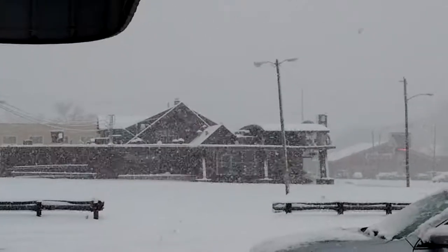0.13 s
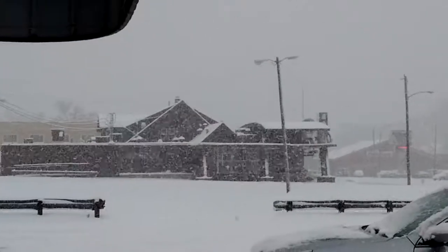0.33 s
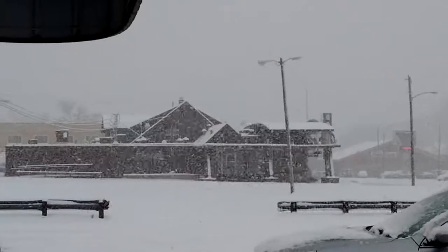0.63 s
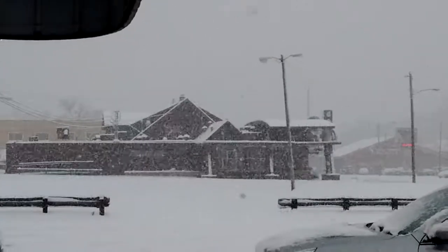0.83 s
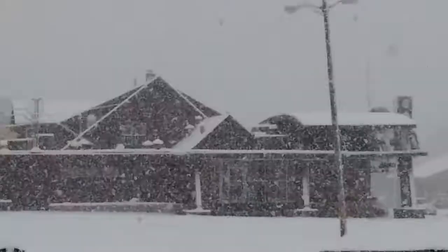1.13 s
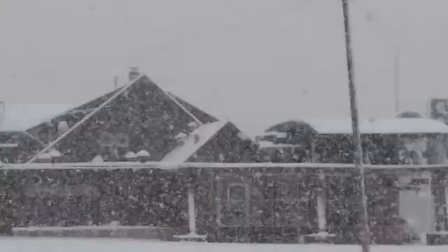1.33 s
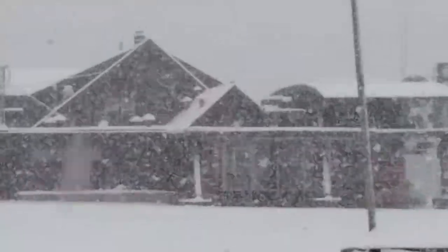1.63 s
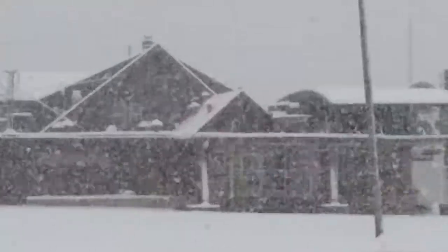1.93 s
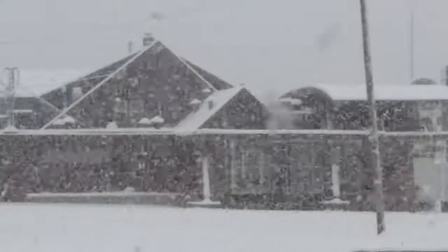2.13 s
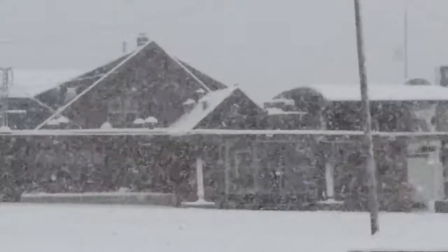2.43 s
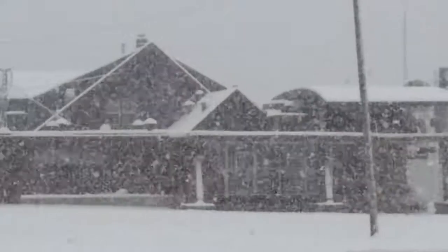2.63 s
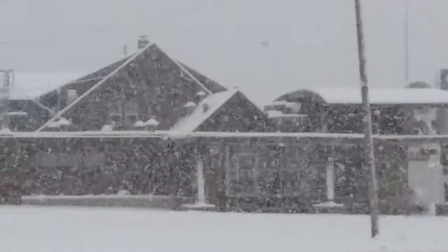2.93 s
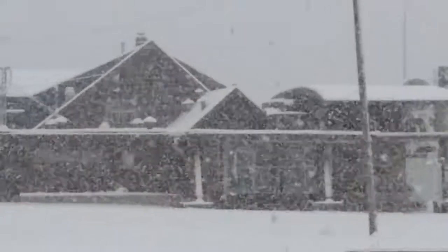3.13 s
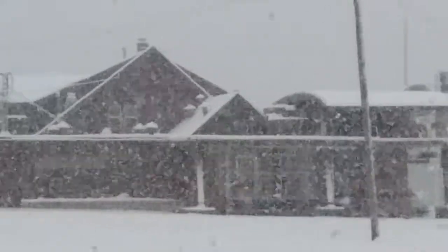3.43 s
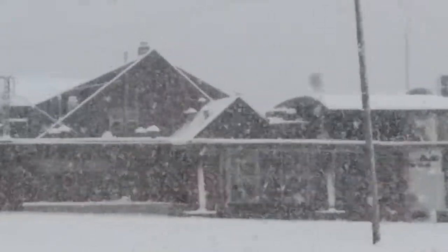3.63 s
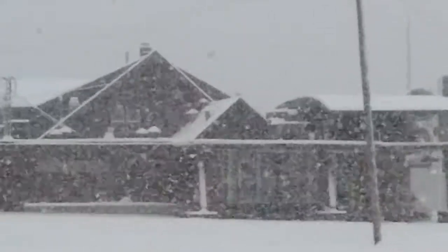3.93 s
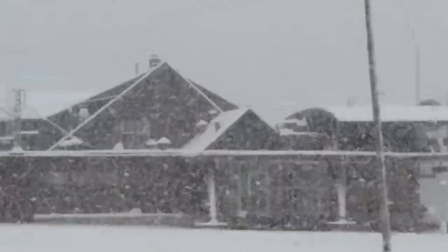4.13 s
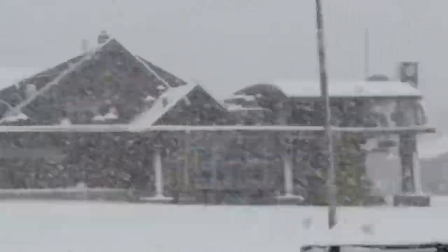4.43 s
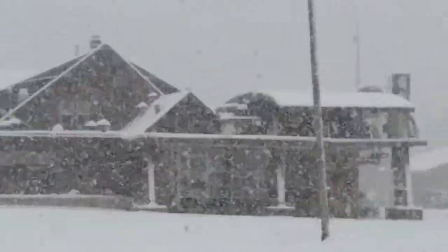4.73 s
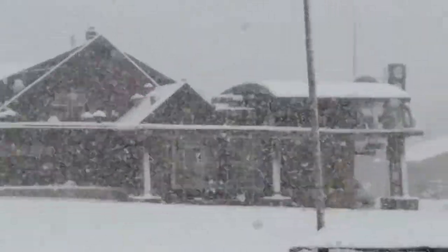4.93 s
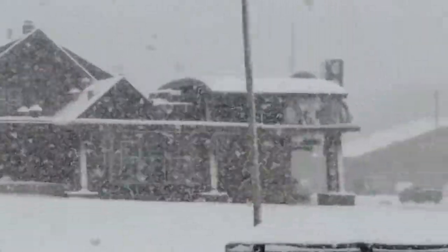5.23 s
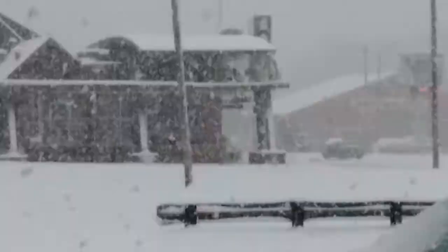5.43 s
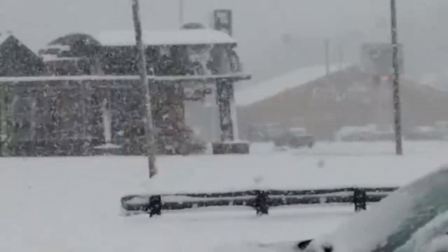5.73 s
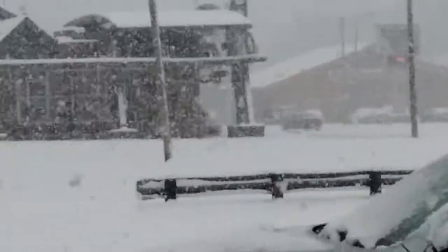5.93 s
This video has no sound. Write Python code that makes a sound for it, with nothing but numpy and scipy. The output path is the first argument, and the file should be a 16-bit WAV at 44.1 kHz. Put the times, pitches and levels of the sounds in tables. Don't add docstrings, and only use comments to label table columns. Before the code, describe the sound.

Wind rumbles and snowy hiss slowly fades as a machine chuffs away with faint squeaks; finger ticks and a hard knock hit the phone case.

```python
import sys
import numpy as np
from scipy import signal
from scipy.fft import rfft, irfft, next_fast_len
from scipy.io import wavfile
from scipy.ndimage import uniform_filter1d

SR = 44100
rng = np.random.default_rng(int(sys.argv[2]) if len(sys.argv) > 2 else 0)


def natural_amplitude(level_db):
    exponent = np.asarray(level_db, float) / 20
    return 10 ** exponent


def unload_audio(sound):
    columns = np.transpose(np.atleast_2d(sound))
    steps = np.round(np.clip(columns, -1, 1) * 32767)
    wavfile.write(sys.argv[1], SR, steps.astype(np.int16))


N = 268965


def evened(x):
    return x / np.sqrt(np.mean(x ** 2) + 1e-20)


def swell(t, ms):
    return np.exp(-(2000 * t / ms) ** 2)


def read(points, hz, column=1):
    table = np.transpose(points)
    return np.interp(np.log(hz + 1), np.log(table[0] + 1), table[column])


def resonate(x, hz, width):
    carrier = np.exp(2j * np.pi * np.cumsum(hz * np.ones(len(x))) / SR)
    r = np.exp(-np.pi * width / SR)
    return 2 * (carrier * signal.lfilter([1 - r], [1, -r], x / carrier)).real


def capsules(x, lag_ms, balance_db):
    size = next_fast_len(len(x))
    delay = np.exp(-2j * np.pi * np.fft.rfftfreq(size, 1 / SR) * lag_ms / 1000)
    late = irfft(rfft(x, size) * delay, size)[:len(x)]
    return np.array([-late * natural_amplitude(balance_db / 2), x * natural_amplitude(-balance_db / 2)])


def add(mix, s, sound):
    part = mix[:, round(s * SR):][:, :sound.shape[1]]
    part += sound[:, :part.shape[1]]


def hits(rows, lag_ms=0.32):
    t, out = np.arange(5120) / SR, np.zeros((2, N))
    for s, db, hz, t60_ms, balance_db in rows:
        onset = (1 - np.exp(-t * hz * 3.8)) ** 2
        ring = np.sin(2 * np.pi * hz * t) * natural_amplitude(-60000 * t / t60_ms) * onset
        add(out, s, capsules(natural_amplitude(db) * ring / abs(ring).max(), lag_ms, balance_db))
    return out


def slips(rows, rise_hz_per_s=0):
    out, t = np.zeros((2, N)), np.arange(-3072, 3072) / SR
    for s, db, hz, ms, width, balance_db in rows:
        glide = hz + rise_hz_per_s * t
        ring = resonate(resonate(rng.standard_normal(len(t)), glide, width), glide, width)
        add(out, s + t[0], capsules(natural_amplitude(db) * evened(ring) * swell(t, ms), 0.313, balance_db))
    return out


# frequency in Hz, shared part from 0 to 1, lead of the difference in radians.
CAPSULE_LIKENESS = [(40, 0.4, -0.5), (130, 0.71, 0.3), (340, 0.34, 1.6), (700, 0.78, 2), (1220, 0.65, 2.5),
                    (1800, 0, 1.7), (2400, 0.9, 2), (3040, 1, -18.5), (3380, 0.56, 2), (4300, 0.77, 0),
                    (5000, 1, 1.3), (6860, 0.3, -2.5), (9000, 1, 16), (16000, 0.3, 25)]


def wash(total, diff, diff_db, patchy_db, flicker_db, ripple_db, size, drift=None):
    hop = size // 4
    frames, hz = N // hop + 5, np.fft.rfftfreq(size, 1 / SR)
    a, b, c, d, patches = rng.standard_normal((frames, len(hz), 5)).T
    patches = uniform_filter1d(patches, size=size // 64, axis=0)
    patches = evened(uniform_filter1d(patches, size=3000 // hop + 2, axis=1))
    flicker = evened(uniform_filter1d(rng.standard_normal(frames), size=4))
    ripple = rng.standard_normal(len(hz))[:, None]
    field_db = patchy_db * patches + flicker_db * flicker + ripple_db * ripple
    if drift is not None:
        field_db = field_db + drift(hz, np.minimum(np.arange(frames) * hop, N - 1))

    share = np.clip(read(CAPSULE_LIKENESS, hz), 0, 1)[:, None]
    lead = np.exp(1j * read(CAPSULE_LIKENESS, hz, column=2))[:, None]
    first = a + 1j * b
    second = share * lead * first + np.sqrt(1 - share ** 2) * (c + 1j * d)
    first = first * natural_amplitude(read(total, hz))[:, None]
    second = second * natural_amplitude(read(diff, hz) + diff_db)[:, None]
    z = np.array([first, second]) * natural_amplitude(field_db)
    mid, side = signal.istft(z, nperseg=size, noverlap=size - hop)[1][:, :N]
    return np.array([mid + side, mid - side]) / mid.std()


# time in seconds, hiss level in dB, wind pressure on the car in dB.
STORM_COURSE = [(0, -35.5, -24), (.6, -36.5, -26.5), (1, -36.5, -24.5), (1.5, -37, -25.5),
                (2.1, -36.5, -24.5), (3.3, -37.5, -25.5), (4, -39, -26.5), (5.2, -42, -24.5),
                (5.5, -41, -22.5), (6.1, -42.5, -26)]


def storm(column):
    table = np.transpose(STORM_COURSE)
    return np.interp(np.arange(N) / SR, table[0], table[column])


# frequency in Hz, density in dB per Hz.
RUMBLE_TOGETHER = [(12, -32), (25, -4), (39, 1.5), (50, -5.5), (75, 1.5), (100, -7.5), (125, -9),
                   (183, -13.5), (278, -17), (416, -15.5), (600, -31), (1000, -110)]
RUMBLE_APART = [(12, -30), (21, -12), (30, -5), (39, -1.5), (60, -1.5), (86, -1), (101, -6), (120, -9.5),
                (142, -7.5), (188, -12.5), (220, -11.5), (300, -16.5), (400, -23.5), (1000, -110)]


def rumble():
    return natural_amplitude(storm(column=2) - 22) * wash(RUMBLE_TOGETHER, RUMBLE_APART, 22.4, 2.6, 0.4, 0, size=4096)


# frequency in Hz, density in dB per Hz.
HISS_TOGETHER = [(240, -26), (400, -22.5), (500, -17), (620, -8.5), (780, -6.5), (1320, 0), (1590, -1.5),
                 (2020, -8.5), (2600, -13.5), (2960, -25.5), (3600, -19.5), (4350, -15), (5050, -23.5),
                 (5350, -27), (6300, -35.5), (7800, -27.5), (9500, -37.5), (11500, -77)]
HISS_APART = [(240, -36), (400, -3), (500, -1), (600, -2), (720, 1), (1250, -8.5), (1610, -21),
              (2040, -14.5), (2490, -7.5), (2840, -13), (3330, -11), (3960, -23), (6800, -28), (8200, -36),
              (9300, -36), (11500, -80)]
# time in seconds, depth in dB, length in ms.
HAND_SHADES = [
    (.9, 3, 280),
    (4.35, 3.5, 830),
]
# frequency in Hz, share of the turn's dB.
SWING_COLOUR = [(600, 0), (1150, -1), (1450, 0), (1800, 1), (2800, 0)]
FIZZ_DB, FIZZ_FADE = 1, 0.18
SWING_DB, SWING_FROM_S, SWING_TAKES_S = 1.5, 4.35, 0.69


def hiss():
    level_db, t = storm(column=1), np.arange(N) / SR
    shade_db = sum(db * swell(t - s, ms) for s, db, ms in HAND_SHADES)
    fizz_db = FIZZ_DB + FIZZ_FADE * (level_db - level_db[0]) - shade_db
    swing_db = SWING_DB * np.clip((t - SWING_FROM_S) / SWING_TAKES_S, 0, 1)

    def drift(hz, at):
        return (hz > 3000)[:, None] * fizz_db[at] + read(SWING_COLOUR, hz)[:, None] * swing_db[at]

    return natural_amplitude(level_db) * wash(HISS_TOGETHER, HISS_APART, 0, 1.0, 0.99, 2.33, size=1024, drift=drift)


# frequency in Hz, level in dB, start in seconds, end in seconds, width in Hz.
MOTOR_TONES = [
    (166, -35, 0, .75, 10),
    (207, -41, .85, 2.3, 10),
    (910, -51, 0, .7, 6),
    (1367, -41, 0, .72, 14),
    (1641, -43, 0, .8, 8),
    (1125, -50, 0, 2.2, 14),
    (2463, -56, 0, 3.5, 8),
    (70, -35, 2.2, 6.1, 5),
    (2921, -59, 0, .7, 6),
    (4380, -54, 0, .85, 350),
]


def whines():
    out = np.zeros((2, N))
    for hz, db, start, end, width in MOTOR_TONES:
        t = np.arange(round((end - start) * SR)) / SR
        gate = np.clip(np.minimum(t + 0.084, end - start - t) / 0.17, 0, 1)
        fuzz = evened(resonate(rng.standard_normal(len(t)), hz, width))
        tone = fuzz + 120 / (width + 90) * np.sin(2 * np.pi * hz * t)
        lag_ms, balance_db = (.33, -1.5) if hz > 400 else (.09, 1.1)
        add(out, start, capsules(natural_amplitude(db) * gate * evened(tone), lag_ms, balance_db))
    return out


# frequency in Hz, density in dB per Hz.
SELF_TOGETHER = [(8400, -35), (9500, -1.5), (13200, -0.5), (13500, -11), (13700, -46), (14450, -46),
                 (14600, -5), (15480, 3), (15600, -50)]
SELF_APART = [(8400, -30), (9400, 11.5), (11700, -29), (12300, 6), (13000, -2), (15000, 2), (15250, -7),
              (15400, -50)]
# frequency in Hz, rms level in dB.
PICKUP_LINES = [(10000, -90), (12800, -83), (13000, -75), (13200, -87), (15000, -86), (15200, -89)]
BUZZ_DB, BUZZ_RING_HZ = -74, 9000
BUZZ_HZ, FRAME_HZ = 200, 25


def electronics():
    t = np.arange(N) / SR
    lines = sum(natural_amplitude(db) * np.sqrt(2) * np.sin(2 * np.pi * hz * t) for hz, db in PICKUP_LINES)
    sparks = np.diff(np.floor(t * BUZZ_HZ), prepend=0) * (t * FRAME_HZ % 1 < .5)
    buzz = natural_amplitude(BUZZ_DB) * evened(resonate(resonate(sparks, BUZZ_RING_HZ, 900), BUZZ_RING_HZ, 900))
    noise = natural_amplitude(-67.0) * wash(SELF_TOGETHER, SELF_APART, -0.89, 1.4, 0.82, 0.74, size=512)
    return noise + (lines + buzz) * np.array([[1.5], [.6]])


# time in seconds, level in dB, length in ms, left minus right in dB.
PALM_THUDS = [
    (0.099, -32, 49, 1),
    (.82, -42, 140, -3.5),
    (3.6, -37.5, 60, 6.5),
    (4.1, -37.5, 53, 7),
    (4.201, -34.5, 70, 6),
    (4.3, -43, 46, 12.5),
]


def thuds():
    return slips([(s, db, 148.5, ms, 83, side) for s, db, ms, side in PALM_THUDS])


CHUFF_LEVELS = [
    1.5,
    -1.5,
    -5.5,
    -1.5,
    2,
    3,
    3.5,
    1.5,
    6.5,
    -13,
]
# frequency in Hz, density in dB per Hz.
CHUFF_TOGETHER = [(300, -55), (600, -16.5), (680, -3), (770, -4.5), (1000, -14), (1500, 5.5), (1950, -23.5),
                  (2270, -2), (3020, -33.5), (3500, -15), (4600, -13.5), (5490, -24), (6600, -41),
                  (7940, -21), (9160, -44), (13000, -54), (13600, -94)]
CHUFF_APART = [(240, -37), (400, 0), (587, -10), (770, -2), (967, -9), (1660, -20), (2300, -8), (2850, -22),
               (3480, -17), (3950, -23), (4500, -26), (9420, -40), (12000, -52), (15600, -80),
               (22000, -120)]
TURN_S, FIRST_TURN_S = .351, .542
CHUFF_MS, CHUFF_SHARPEN, CHUFF_LONGEST_MS = 38, .7, 90


def chuffs():
    t, puffs = np.arange(N) / SR, np.zeros(N)
    for k, db in enumerate(CHUFF_LEVELS):
        ms = min(CHUFF_MS * natural_amplitude(-CHUFF_SHARPEN * db), CHUFF_LONGEST_MS)
        puffs += natural_amplitude(db) * swell(t - FIRST_TURN_S - k * TURN_S, ms)
    noise = wash(CHUFF_TOGETHER, CHUFF_APART, 3.2, 0.86, 2.7, 0.89, size=512)
    return natural_amplitude(storm(column=1)) * 1.41 * puffs * noise


# time in seconds, peak in dB, ring in Hz, 60 dB decay in ms, left minus right in dB.
FINGER_TICKS = [(0.7893, -6, 885, 1.3, -3), (0.7892, -18, 170, 16, 1), (3.5837, -14, 160, 29, -1),
                (1.473, -22.5, 2400, 10, -2), (3.5834, -9, 824, 1.2, -0.5), (4.193, -26, 3020, 1.5, 1),
                (4.2042, -19.5, 2250, 10, -3), (4.291, -19, 885, 1.6, -7), (4.341, -30.5, 4420, 3.7, 1),
                (4.3582, -24, 1510, 1.5, -11), (4.37, -18, 340, 5.2, 6.5), (4.5688, -19, 1800, 1.6, -4),
                (4.586, -24.5, 2300, 25, -3), (4.744, -26, 1800, 4, 1), (5.6372, -22, 1540, 3.1, 0),
                (5.644, -15.5, 1690, 1.4, -1)]


def ticks():
    return hits(FINGER_TICKS)


# time in seconds, level in dB, centre in Hz, length in ms, left minus right in dB.
FINGER_RUBS = [(0.904, -50.5, 6900, 110, -6), (4.195, -54, 6000, 18, 7), (4.265, -53, 5570, 14, 10),
               (4.342, -53, 7800, 27, 0), (4.34, -62, 13500, 30, 0), (4.44, -56, 8000, 26, -4),
               (4.49, -59, 12000, 17, 0), (4.47, -26, 410, 45, -4), (4.481, -32, 1470, 18, -3),
               (4.485, -49.5, 7550, 34, -5), (4.506, -28.5, 700, 28, 5), (5.645, -33.5, 584, 12, 6)]


def rubs():
    return slips([(s, db, hz, ms, min(hz, 2500), side) for s, db, hz, ms, side in FINGER_RUBS])


# time in seconds, level in dB, pitch in Hz.
JOINT_SQUEAKS = [
    (1.22, -48, 4730),
    (1.91, -46, 4820),
    (2.255, -40.5, 5000),
    (2.559, -50, 5000),
    (2.6, -37, 4980),
    (2.88, -45, 4920),
    (2.924, -38, 4830),
    (3.27, -47, 4940),
    (3.61, -49.5, 4840),
]
SQUEAK_MS, SQUEAK_WIDTH_HZ, SQUEAK_RISE_HZ_PER_S, SQUEAK_BALANCE_DB = 28, 280, 5000, 6


def squeaks():
    rows = [row + (SQUEAK_MS, SQUEAK_WIDTH_HZ, SQUEAK_BALANCE_DB) for row in JOINT_SQUEAKS]
    return slips(rows, SQUEAK_RISE_HZ_PER_S)


# time in seconds, peak in dB, ring in Hz.
GLASS_CRACKS = [(4.3028, -36, 9000), (4.303, -35, 11400), (4.335, -35, 8200), (4.341, -35, 8400),
                (4.341, -42, 13000), (4.358, -34, 7600), (4.497, -24, 7150), (4.505, -33, 7600),
                (5.6442, -27.5, 7600), (5.6443, -38, 13000), (5.637, -38, 4300)]


def cracks():
    return hits([row + (2, -6) for row in GLASS_CRACKS])


# time in seconds, peak in dB, ring in Hz, 60 dB decay in ms.
DASHBOARD_BOOMS = [
    (4.3705, -13, 125, 45),
    (4.383, -14, 70, 40),
    (4.4545, -13, 145, 60),
    (4.4695, -15, 140, 40),
    (4.4758, -16, 105, 70),
    (4.4975, -10, 140, 115),
    (4.455, -29, 290, 70),
    (4.499, -23, 270, 90),
]


def booms():
    rows = [row + (1.2,) for row in DASHBOARD_BOOMS]
    low = [row for row in rows if row[2] < 200]
    overtones = [row for row in rows if row[2] >= 200]
    return hits(low, lag_ms=.38) + hits(overtones, lag_ms=.9)


# time in seconds, peak in dB, ring in Hz, 60 dB decay in ms, left minus right in dB.
CASE_KNOCK = [
    (4.468, -9, 960, 2.2, 1),
    (4.469, -17, 1960, 4.3, -4),
    (4.483, -18, 2150, 8.4, 3),
    (4.4962, -14.5, 2020, 16, -4),
    (4.4979, -9.5, 870, 5, -9.5),
    (4.5046, -9.5, 1270, 1.3, -2),
    (4.512, -10.5, 1800, 7.8, 4),
    (4.5131, -10, 1800, 3.4, -5),
    (4.514, -17.5, 890, 16, -4),
]


def knock():
    return hits(CASE_KNOCK)


def cabin(x):
    t = np.arange(2048) / SR
    tail = rng.standard_normal((2, len(t))) * natural_amplitude(-60 * t / 0.052) * (t > .0012)
    tail = signal.lfilter([1, -1], [1, -.93], tail)
    return x + natural_amplitude(-14.5) * signal.oaconvolve(x, tail / np.linalg.norm(tail[0]), axes=1)[:, :N]


def scene():
    outside = rumble() + hiss() + whines() + chuffs() + squeaks()
    return outside + cabin(ticks() + cracks() + knock()) + thuds() + rubs() + booms()


# time in seconds, depth in dB.
GAIN_DUCKS = [
    (.795, 3),
    (3.59, 2),
    (4.52, 8),
    (5.65, 1.5),
]
RECOVER_DB_PER_S, RECOVER_FREE_DB = 10.5, .8


def gain_control():
    t, duck_db = np.arange(N) / SR, np.zeros(N)
    for s, depth_db in GAIN_DUCKS:
        progress = np.maximum(t - s, 0) * RECOVER_DB_PER_S / (depth_db - RECOVER_FREE_DB)
        duck_db += depth_db * (t > s) * np.exp(-progress ** 3.0)
    return uniform_filter1d(duck_db, size=900)


# lower edge in Hz, upper edge in Hz, share of the time lost at the start, share at the end.
WEAK_BANDS = [(170, 215, .4, .35), (215, 260, .4, .4), (260, 345, .3, .3), (2850, 3100, .03, .1),
              (6100, 6500, -.05, .6), (6500, 6900, -.1, .55), (9500, 9900, .12, .05),
              (10200, 10500, .15, .05), (10900, 11200, .15, .05), (11500, 11800, .15, .05),
              (13500, 14500, .9, .9)]


def drop_out(x):
    hz, t, z = signal.stft(x.mean(0), SR, nperseg=1024)
    lost = np.zeros(z.shape)
    for low_hz, high_hz, early, late in WEAK_BANDS:
        chance = uniform_filter1d(rng.standard_normal(len(t)), size=5).argsort().argsort() / len(t)
        lost[(hz > low_hz) & (hz < high_hz)] = chance < np.interp(t, [0, t[-1]], [early, late])
    loud = uniform_filter1d(abs(z), size=9, axis=0)
    lost *= loud < 2.5 * np.median(loud, axis=1, keepdims=True)
    return x - 0.87 * signal.istft(z * lost, SR, nperseg=1024)[1][:N]


def top_cut(x):
    return signal.sosfilt(signal.butter(12, 15710, fs=SR, output="sos"), x)


def record(dry):
    duck_db = gain_control()
    sound = dry * natural_amplitude(-duck_db) + electronics() * natural_amplitude(-.75 * duck_db)
    sound = signal.oaconvolve(sound, signal.firwin(255, 15600, fs=SR)[None], "same")
    return top_cut(drop_out(sound))


dry = scene()
out = record(dry)
unload_audio(out)
```